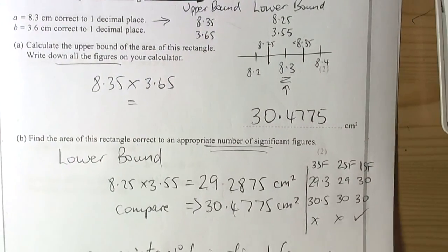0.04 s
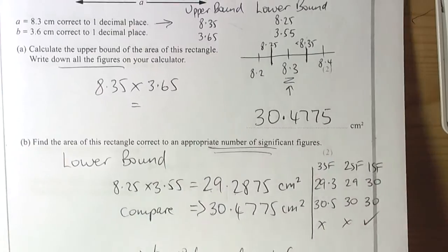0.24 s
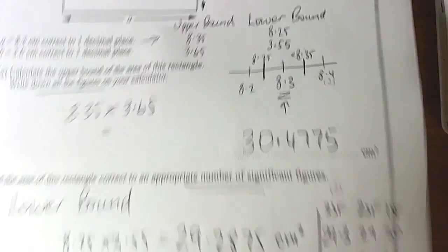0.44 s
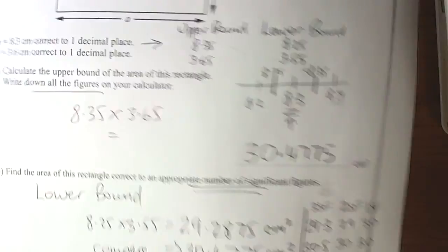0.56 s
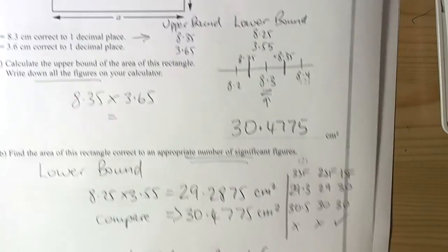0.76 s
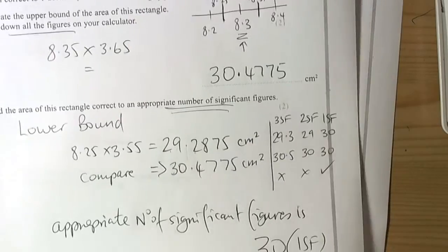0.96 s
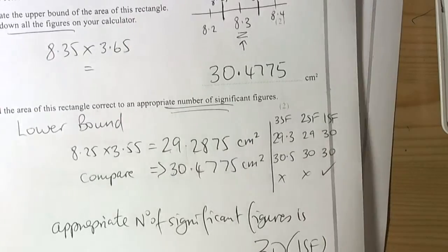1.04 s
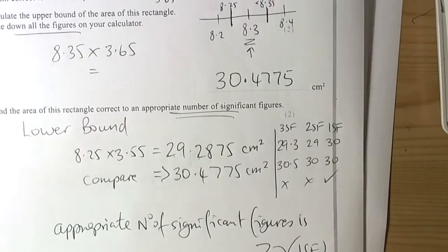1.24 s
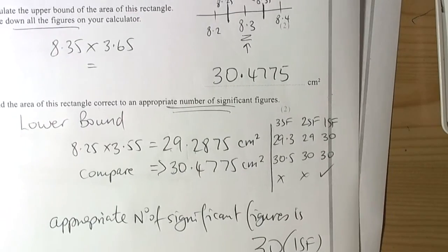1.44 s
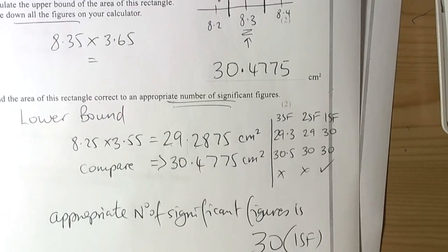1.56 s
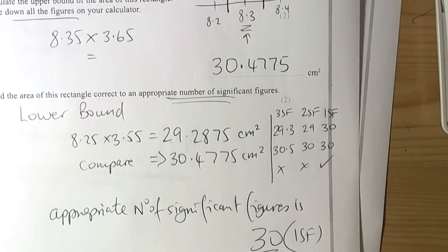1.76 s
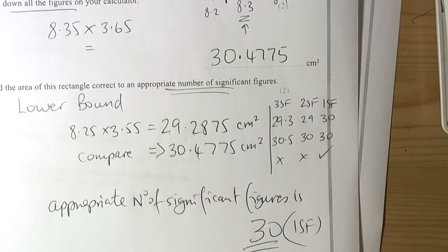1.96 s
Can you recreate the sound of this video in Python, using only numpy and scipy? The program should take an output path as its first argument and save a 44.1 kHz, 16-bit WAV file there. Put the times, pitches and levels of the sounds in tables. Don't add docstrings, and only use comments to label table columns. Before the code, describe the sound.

Paper rustling on a desk: a hissing drag, loud snapping creases, another slide, then near quiet

```python
import sys
import numpy as np
from scipy import signal
from scipy.fft import rfft, irfft, next_fast_len
from scipy.io import wavfile
from scipy.ndimage import uniform_filter1d, map_coordinates

SR = 44100
rng = np.random.default_rng(int(sys.argv[2]) if len(sys.argv) > 2 else 0)


def voltage_ratio(decibels):
    exponent = np.asarray(decibels, float) / 20
    return 10 ** exponent


def wav_record(signal):
    frames = np.transpose(np.atleast_2d(signal))
    bounded = np.clip(frames, -1, 1)
    quanta = np.round(bounded * 32767).astype(np.int16)
    wavfile.write(sys.argv[1], SR, quanta)


N = 88200


def unit(x):
    return x / np.sqrt(np.mean(x ** 2) + 1e-20)


def along(points, hz):
    f, v = np.transpose(points)
    return np.interp(np.log(hz + 1), np.log(f + 1), v)


def curves(rows):
    s, first, *others = np.transpose(rows)
    t = np.arange(N) / SR
    return [np.interp(t, s, first, -150, -150)] + [np.interp(t, s, column) for column in others]


def wobble(rate):
    knots = rng.standard_normal(int(N * rate / SR) + 4)
    return map_coordinates(knots, [np.arange(N) * rate / SR])


def coloured(x, points):
    m = 2 * next_fast_len(x.shape[-1] // 2 + 4096)
    gain = voltage_ratio(along(points, np.fft.rfftfreq(m, 1 / SR)))
    cepstrum = irfft(np.log(gain + 1e-5), m)
    cepstrum[1:m // 2] *= 2
    cepstrum[m // 2 + 1:] = 0
    return irfft(rfft(x, m) * np.exp(rfft(cepstrum)), m)[..., :x.shape[-1]]


def grit(rate, spread_db, points, patchy_db):
    chance, sign, size = rng.random((3, N))
    hits = (chance < rate / SR) * np.sign(sign - 0.5) * voltage_ratio(-spread_db * np.log(size + 1e-4))
    z = signal.stft(hits, nperseg=256)[2]
    field = uniform_filter1d(rng.standard_normal(z.shape), 4, 0)
    field = uniform_filter1d(field, 10, 1)
    patchy = signal.istft(z * voltage_ratio(patchy_db * unit(field)), nperseg=256)[1][:N]
    return unit(coloured(patchy, points))


def room():
    # frequency in Hz, level in dB.
    room_colour = [(40, -48), (75, -15.5), (150, -0.5), (260, -6), (450, -16), (1000, -18.5), (3000, -24),
                   (8000, -30)]
    level_db, alike = -68, 0.94
    a, b = coloured(rng.standard_normal((2, N)), room_colour)
    angle = np.arccos(alike) / 2
    shared, apart = np.cos(angle) * a, np.sin(angle) * b
    pair = unit(np.array([shared + apart, shared - apart]))
    return voltage_ratio(level_db + 1.2 * wobble(12)) * pair


def bumps():
    # start in seconds, level in dB, pitch in Hz, length
    # in cycles, left over right in dB.
    desk_bumps = [(.156, -57, 241, 6.1, .4), (.376, -49, 381, 6.1, 3.1), (.391, -54, 86, 2.1, 2.1),
                  (.424, -37, 331, 1.9, 3.1), (.441, -43, 291, 7.1, 2.1), (.456, -47, 91, 2.6, 2.1),
                  (.486, -42, 96, 3.1, 2.1), (.576, -41, 361, 4.1, 3.1), (.62, -52, 62, 2.1, 2.1),
                  (.723, -45.2, 138, 3.2, 3.6), (.726, -40, 347, 1.8, 11), (.7845, -30, 346, 3.3, 8.5),
                  (.793, -44, 351, 9, 8.5), (.975, -52, 113, 2.2, 7.1), (1.136, -57, 91, 2.6, 5.1),
                  (1.163, -48, 405, 3.2, 9.5), (1.1875, -34.6, 105.5, 2.95, 14),
                  (1.236, -59, 92, 2.6, -4.9), (1.411, -58.5, 231, 3.5, -4.4),
                  (1.461, -58.5, 255, 6.4, 2.4), (1.455, -61.5, 3800, 95, -3.6),
                  (1.47, -64, 3860, 280, -4.4), (1.53, -62, 179, 3.1, -2.4), (1.761, -67, 76, 3.1, .4),
                  (1.86, -63, 2500, 150, -4.1)]
    t = np.arange(N) / SR
    waver = wobble(500)
    out = np.zeros((2, N))
    for s, db, hz, cycles, pan_db in desk_bumps:
        phase = 2 * np.pi * hz * (t - s) + np.minimum(0.02 * cycles, 2.4) * waver
        swell = np.sin(np.pi * np.clip((t - s) * hz / cycles, 0, 1))
        out += voltage_ratio(db + np.array([[0], [-pan_db]])) * np.sin(phase) * swell
    return out


def pops():
    # start in seconds, peak in dB, pitch in Hz, 60 dB decay in seconds.
    buckles = [(.3925, -36, 940, .05), (.4252, -12, 5710, 0.011), (.4252, -14, 1824, 0.01),
               (.477, -17.5, 1080, 0.078), (.4927, -2, 1050, 0.015), (.4927, -5.5, 2152, 0.029),
               (0.4931, -7.5, 6500, 0.016), (.4929, -8, 3700, 0.014), (0.4953, -6.5, 4350, 0.019),
               (0.6269, -7, 1500, 0.0063), (.4962, -9.5, 2136, 0.023), (.504, -15, 4370, 0.01),
               (.533, -15, 1084, .03), (.5786, -11, 3950, .014), (.5925, -18, 1190, 0.013),
               (.6, -19, 1294, .03), (.6269, -3, 2100, .014), (.631, -12, 2600, .02),
               (.6268, -7.5, 3240, 0.0027), (.6268, -22, 850, 0.014), (.6365, -13, 2244, 0.017),
               (.652, -23.5, 1140, 0.027), (.7295, -30.5, 1290, 0.014), (.7847, -7, 3790, .012),
               (.7848, -20.5, 1446, 0.033), (.7848, -19.5, 5450, 0.019), (.787, -28, 2673, 0.063),
               (.8242, -33.5, 5420, 0.041), (.8445, -23.5, 6540, 0.011), (.8445, -25.5, 4860, 0.0078),
               (.8447, -29.5, 3030, 0.026), (.846, -36.5, 1118, 0.037), (.8445, -35.5, 480, 0.061),
               (0.7292, -24, 2600, 0.018), (0.7835, -15.5, 4600, .012), (.683, -26, 1000, .05),
               (.712, -31, 1100, 0.012), (.718, -30.5, 4300, 0.02)]
    # frequency in Hz, level in dB.
    sheet_low = [(150, -50), (500, -14), (1000, 0)]
    rise_s = 0.00038
    rings = np.zeros(N)
    for s, db, hz, t60 in buckles:
        age = np.maximum(np.arange(N) / SR - s, 0)
        rings += voltage_ratio(db - 60 * age / t60) * (1 - np.exp(-age / rise_s)) * np.sin(2 * np.pi * hz * age)
    return coloured(rings, sheet_low)


def snaps():
    # start in seconds, peak in dB, dullness in dB, crackle length in seconds,
    # ringing in Hz.
    creases = [(0.3922, -31, -2.5, 0.0038, 990), (0.4222, -9.5, -12, 0.0016, 4070),
               (0.4253, -3, -10.5, 0.00087, 3820), (0.4927, -2.5, 0.5, 0.0013, 6494),
               (0.4952, -2, -5, 0.0035, 4280), (0.502, -15, 2, 0.0059, 3840),
               (0.5783, -12, -14, 0.0008, 3780), (.588, -16.5, -13.5, 0.0053, 4450),
               (0.6268, -3.5, -7, 0.00023, 2180), (.630, -13, -11, 0.002, 4460),
               (0.633, -9, -17, 0.0014, 2310), (0.646, -23, -7.5, 0.0048, 2550),
               (0.729, -21.5, -9, 0.00087, 2605), (0.7846, -8.5, -16, 0.0011, 4070),
               (0.8443, -21, -11.5, .0005, 4760)]
    # frequency in Hz, level in dB.
    crack_colour = [(880, -27.5), (1500, -2.5), (2630, -1), (3060, -6), (3920, 0), (4690, -2), (5880, -6),
                    (6340, -9), (7740, -25), (10100, -57.5), (17000, -120)]
    # frequency in Hz, level in dB.
    thump_colour = [(120, -42), (350, -6), (600, -19.5), (1050, 8), (1400, 0.5), (1800, -10), (3000, -47.5)]
    crack_t60, thump_t60, ring_t60 = 0.014, 0.033, 0.0025
    tail_db, tail_t60 = -22, 0.4
    click_db, ring_db, rise_s = 18, -0.5, 0.00013
    out = np.zeros(N + SR)
    t = np.arange(SR // 5) / SR
    impulse = 1.0 * (t == 0)
    for s, db, dull_db, hold_s, hz in creases:
        late = np.maximum(t - hold_s, 0)
        click = coloured(impulse, crack_colour) + voltage_ratio(dull_db + 9.5) * coloured(impulse, thump_colour)
        a, b, c = rng.standard_normal((3, len(t)))
        fade = voltage_ratio(-60 * late / crack_t60) + voltage_ratio(tail_db - 60 * t / tail_t60)
        crack = unit(coloured(a, crack_colour)) * fade
        thump = unit(coloured(b, thump_colour)) * voltage_ratio(dull_db + 4 - 60 * late / thump_t60)
        rough = unit(coloured(c, [(hz / 2.2, -40), (hz, 0), (hz * 1.1, -40)]))
        ring = voltage_ratio(ring_db - 60 * late / ring_t60) * (np.sin(2 * np.pi * hz * t) + 0.39 * rough)
        body = (crack + thump + ring) * (1 - np.exp(-t / rise_s))
        out[round(s * SR):][:len(t)] += voltage_ratio(db - 10.5) * (body + voltage_ratio(click_db) * click)
    return out[:N]


def flex():
    # time in seconds, level in dB.
    bending = [(.375, -63.5), (.43, -34), (.485, -23), (.555, -26.5), (.595, -27), (.62, -29),
               (.652, -33.5), (.69, -40), (.77, -75)]
    # frequency in Hz, level in dB.
    hollow_colour = [(45, -46), (95, -23.5), (400, -15.5), (750, -6), (1050, -0.5), (1600, -8), (2300, -8),
                     (4000, -50)]
    level_db = curves(bending)[0] + 2.4 * wobble(90)
    return voltage_ratio(level_db) * grit(2000, 1.1, hollow_colour, 1.8)


def lifted_hiss(fibre, heavy):
    # time in seconds, edge hiss in dB, belly over hiss in dB.
    lifts = [
        [(.362, -52.5, -1.5), (.39, -45, -3), (.45, -32, -10), (.51, -30.5, -1), (.56, -37.5, -15.5),
         (.615, -48, 5)],
        [(.615, -52.5, -9.5), (.645, -40.5, 8), (.685, -48, 0.5), (.72, -44.5, -5.5), (.77, -41.5, -13.5),
         (.82, -38.5, -14.5), (.865, -39, -9.5), (.89, -56, -21)],
    ]
    out = np.zeros(N)
    for rows in lifts:
        hiss_db, belly_db = curves(rows)
        out += voltage_ratio(hiss_db) * (fibre + voltage_ratio(belly_db) * heavy)
    return out * voltage_ratio(3.3 * wobble(70))


def trailing_edge(light, board, heavy):
    # time in seconds, level in dB.
    settling = [
        (1.17, -60),
        (1.22, -46),
        (1.29, -56),
        (1.335, -79.5),
    ]
    brush = coloured(light + 0.32 * board + 0.21 * heavy, [(3500, -14.0), (7500, 2)])
    return voltage_ratio(curves(settling)[0]) * unit(brush)


def slide():
    # time in seconds, rub level in dB, pressure (board over rub) in dB.
    strokes = [
        [(0, -81.5, -11), (.068, -61.5, -22), (.076, -48, -12.5), (.146, -48, -6), (.218, -26, -12.5),
         (.272, -27.5, -16), (.325, -32, -9), (.36, -34.5, -2), (.366, -49.5, 1.5)],
        [(.86, -54.5, -12), (.906, -36.5, -33), (.962, -37, -9), (.972, -34, -7.5), (1.095, -32.5, -16.5),
         (1.105, -28.5, -11.5), (1.15, -30.5, -15), (1.195, -37.5, -23.5), (1.23, -67, -18)],
    ]
    # time in seconds, rub level in dB, pressure in dB.
    touches = [
        [(1.34, -70, -2.5), (1.352, -79, -12.5), (1.37, -65, -8.5), (1.53, -66, -7.5), (1.612, -68.5, -8.5),
         (1.66, -76, -9), (1.71, -92, -4)],
        [(1.748, -82.5, -6), (1.756, -75.5, -8), (1.835, -67.5, -7), (1.862, -53.5, -17.5), (1.9, -53.5, -12),
         (1.942, -56.5, -15), (1.97, -68.5, -7), (2.0, -68, -7)],
    ]
    # frequency in Hz, level in dB.
    fibre_colour = [(1700, -40.5), (3350, -7), (3600, -3), (4300, 0.5), (5600, -1.5), (6800, -7.5),
                    (7600, -12), (8300, -29.5)]
    nudge_colour = [(1760, -44), (3000, -13.5), (3260, -17.5), (3600, -5), (4770, -0.5), (6500, -1.5),
                    (7740, -10), (10100, -45), (17000, -120)]
    pulled_colour = [(120, -56.5), (200, -29.5), (366, -13.5), (692, -48), (916, -8), (1150, -15.5),
                     (1420, -5), (1530, -8), (2900, -2.5), (3770, -13), (6380, -120)]
    pushed_colour = [(590, -62.5), (1000, -30.5), (1230, -26.5), (1450, -8.5), (1800, -15.5), (2050, 1.5),
                     (2230, -4.5), (2900, -3), (3770, -21.5), (6380, -120)]
    grains = 8100
    fibre = grit(grains, 1.0, fibre_colour, 2.0)
    light = grit(grains, 1.1, nudge_colour, 3.27)
    heavy = grit(grains, 2.4, pulled_colour, 3.9)
    board = grit(grains, 1.5, pushed_colour, 2.8)
    flutter_db = 1.4 * wobble(52) + 0.66 * wobble(110)
    out = lifted_hiss(fibre, heavy) + trailing_edge(light, board, heavy)
    tops, unders = (fibre, fibre, light, light), (heavy, board, board, board)
    for rows, top, under in zip(strokes + touches, tops, unders):
        rub_db, press_db = curves(rows)
        out = out + voltage_ratio(rub_db + flutter_db) * (top + voltage_ratio(press_db) * under)
    return out


def ports(x):
    # frequency in Hz, left over right in dB.
    balance = [(200, 0.5), (500, 5), (1000, 10.5), (1700, 5), (2300, 1.5), (3200, -11.5), (4800, 0),
               (6500, -5.5), (7200, 1.5)]
    # time in seconds, how far it lies off centre (0 to 1).
    off_centre = [
        (0.299, 0.94),
        (0.451, 0.65),
        (1.2, 0.87),
        (1.899, 0.36),
    ]
    scatter_db, scatter_t60 = -19.5, 0.029
    t = np.arange(SR // 20) / SR
    scatter = coloured(rng.standard_normal((2, len(t))), [(6000, 2.5), (7300, -19.5)])
    scatter = scatter * voltage_ratio(-60 * t / scatter_t60)
    wet = signal.fftconvolve(x[None], scatter / np.linalg.norm(scatter[0]), axes=1)[:, :N]
    lean_db = along(balance, np.fft.rfftfreq(2 * N, 1 / SR)) / 2
    left, right = irfft(rfft(x, 2 * N) * voltage_ratio([lean_db, -lean_db]), 2 * N)[:, :N]
    middle = left + right
    side = np.interp(np.arange(N) / SR, *np.transpose(off_centre)) * (left - right)
    return np.array([middle + side, middle - side]) / 2 + voltage_ratio(scatter_db) * wet


def scene():
    sheet = slide() + flex() + snaps() + pops()
    return ports(sheet) + bumps() + room()


def splatter(x):
    # one port, left then right, in dB.
    fizz_db = [
        [-4],
        [-20],
    ]
    onset, spread_s = 0.85, 0.014
    over = np.maximum(np.abs(x).max(0) - onset, 0)
    over = uniform_filter1d(over, round(spread_s * SR))
    colour = [(7500, -60), (8500, 0), (15500, -4), (16500, -30), (20000, -60)]  # (Hz, dB)
    return voltage_ratio(fizz_db) * over * coloured(rng.standard_normal(x.shape), colour)


def roll_off(x):
    return signal.sosfilt(signal.butter(12, 16500, fs=SR, output="sos"), x)


def record(dry):
    treble_cut = signal.ellip(10, 0.3, 90, 8000, fs=SR, output="sos")
    bass_cut = signal.butter(3, 79, "high", fs=SR, output="sos")
    x = signal.sosfilt(bass_cut, signal.sosfilt(treble_cut, dry))
    x = np.clip(x + splatter(x), -1.0, 1.0)
    return roll_off(x)


dry = scene()
out = record(dry)
wav_record(out)
```